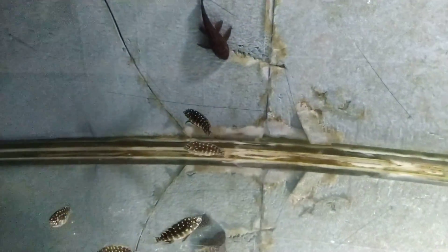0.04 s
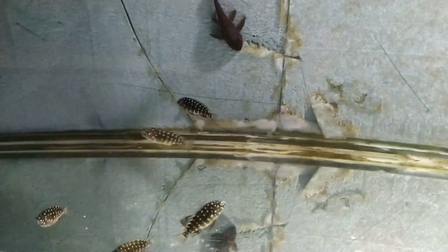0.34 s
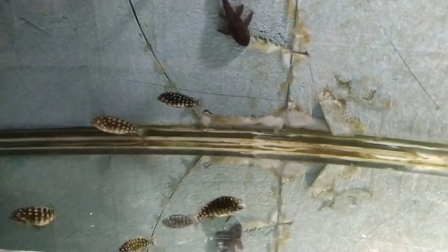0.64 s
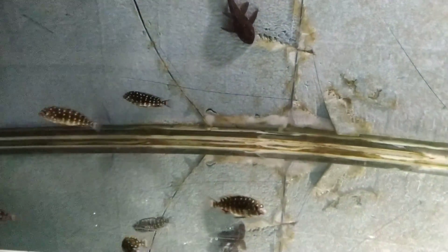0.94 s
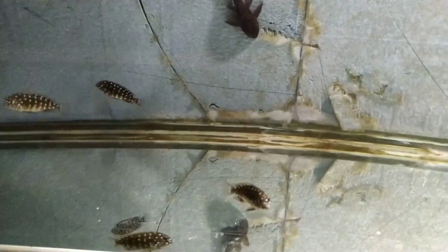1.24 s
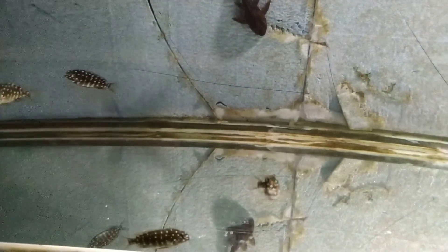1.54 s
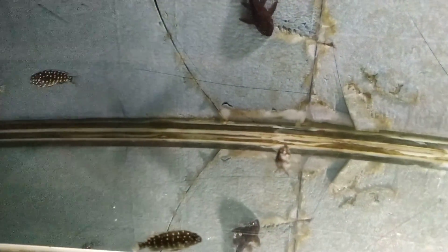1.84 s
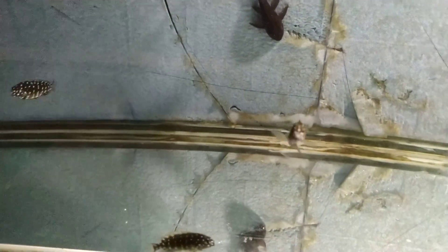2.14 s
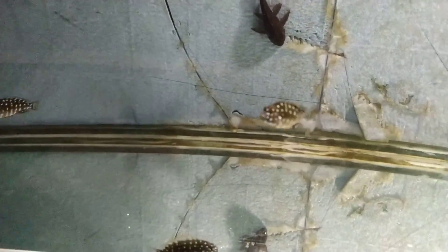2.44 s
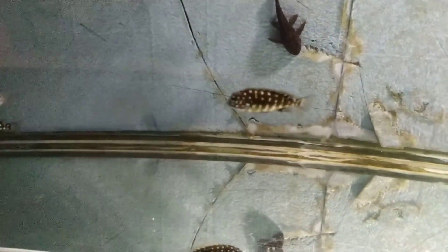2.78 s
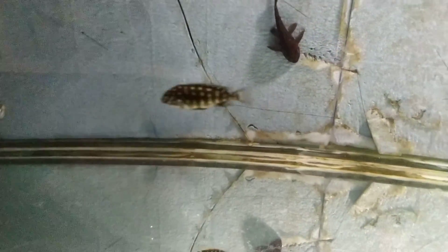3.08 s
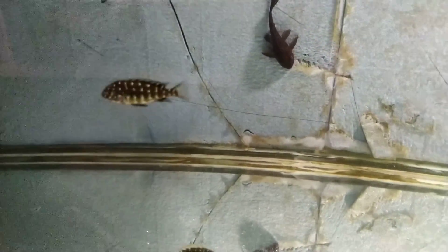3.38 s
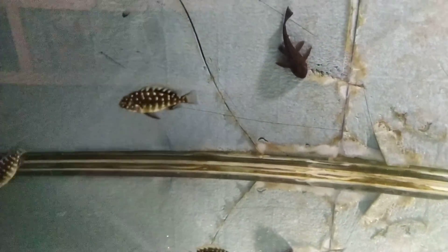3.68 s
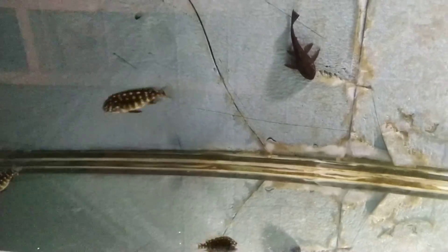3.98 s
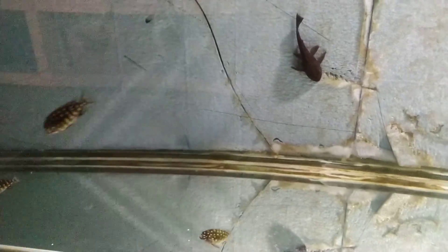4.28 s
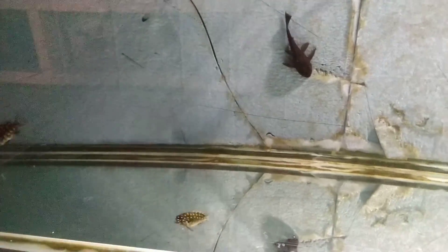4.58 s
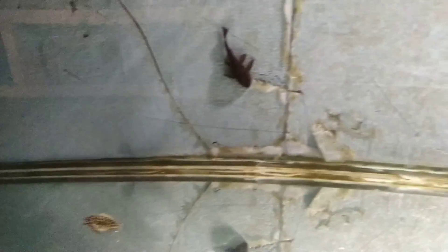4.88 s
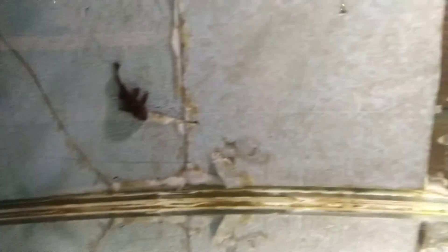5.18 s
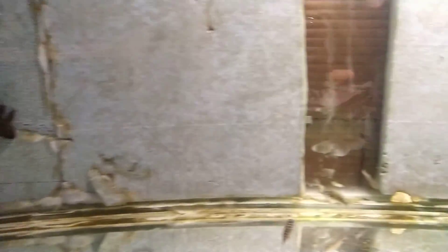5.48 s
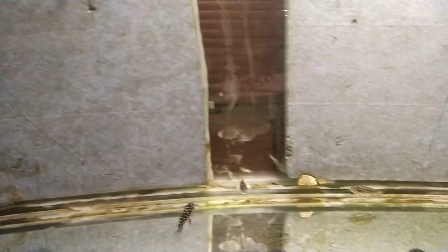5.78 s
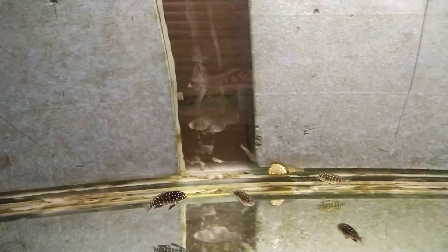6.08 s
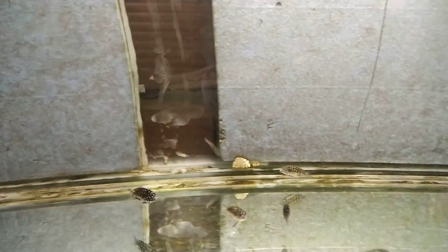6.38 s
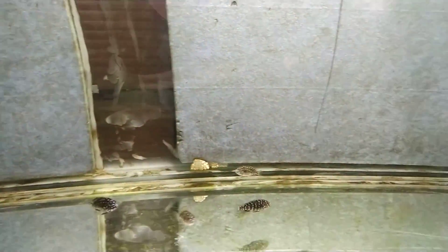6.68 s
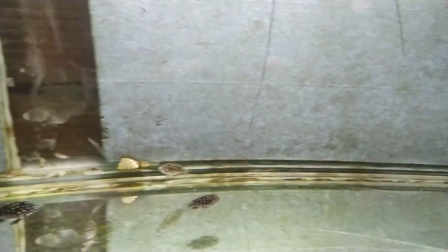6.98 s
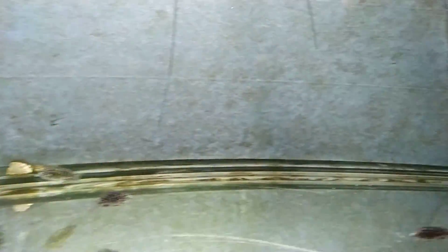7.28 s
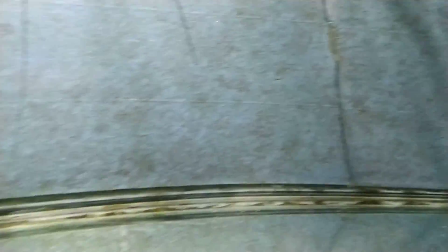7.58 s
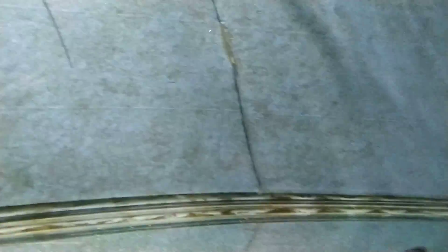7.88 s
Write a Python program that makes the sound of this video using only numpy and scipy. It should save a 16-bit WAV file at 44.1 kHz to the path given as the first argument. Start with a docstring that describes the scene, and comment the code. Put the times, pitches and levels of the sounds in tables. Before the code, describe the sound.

Quiet water trickles in a fish tank indoors, with faint bubble pings and drips above the constant electric hum of a pump. Midway, two electrical pops hit the left side: first a click, then a hard knock far louder than everything else. The microphone travels along the tank, changing the colour of the hum and water, and a soft, short hiss rises just before the end.

```python
"""At an aquarium: a pump hums at mains pitch over softly moving water; small bubbles burst at the surface.
The microphone moves along the tank, so standing waves and tank resonances recolour hum and water.
Twice its left channel pops electrically; the second pop is a hard knock that drives the limiter.
A brief high hiss swells near the end."""
import sys
import numpy as np
from scipy import signal
from scipy.fft import rfft, irfft
from scipy.io import wavfile
from scipy.ndimage import uniform_filter1d

SR = 44100
rng = np.random.default_rng(int(sys.argv[2]) if len(sys.argv) > 2 else 0)


def put_to_file(sound):
    """Save the sound as 16-bit audio at rate SR, in the file named by the first command-line argument."""
    columns = np.atleast_2d(sound).T  # one column per channel
    safe = np.clip(columns, -1, 1)
    whole_steps = np.round(safe * 32767)
    wavfile.write(sys.argv[1], SR, whole_steps.astype(np.int16))


N = 354123
TIME = np.arange(N) / SR

# microphone path: t/s, place along the tank (spots 0, 1, 2)
MIC_PATH = [(0, 0.024), (4.6, 0), (5.7, 0.71), (6.7, 1.28), (7.35, 1.7), (8.03, 1.7)]


def gain_of(db):
    """dB to amplitude factor."""
    return 10 ** (np.asarray(db) / 20)


def unit_rms(x):
    """Scale to rms 1."""
    return x / np.sqrt(np.mean(x ** 2) + 1e-20)


def at_hz(table, hz):
    """Interpolate over log frequency."""
    f, value = np.transpose(table)
    return np.interp(np.log(hz + 1), np.log(f + 1), value)


def follow(table, x):
    """Interpolate linearly."""
    return np.interp(x, *np.transpose(table))


def add(mix, start_s, sound):
    """Mix a sound in at start_s."""
    part = mix[:, max(round(start_s * SR), 0):][:, :sound.shape[1]]
    part += sound[:, :part.shape[1]]


def drift(knots):
    """Slow random curve across the scene."""
    return np.interp(TIME, np.linspace(0, TIME[-1], knots), rng.standard_normal(knots))


def patches(shape, frames, bins):
    """Random field (channel, frame, bin), smoothed, rms 1."""
    field = uniform_filter1d(rng.standard_normal(shape), frames, axis=1)
    return unit_rms(uniform_filter1d(field, bins, axis=2))


def pump(mains_hz=50.0, waver_db=0.37, scatter_rad=0.12, left_delay_s=0.00029):
    """The armature kicks once per mains cycle; high harmonics cross the tank and arrive out of step."""
    # standing-wave hum: harmonic number, peak level/dB at spots 0, 1, 2
    harmonics = [(1, -38.5, -40.5, -42.5), (2, -49, -57, -57), (3, -57.5, -61, -65.5), (4, -56, -57, -64),
                 (5, -67, -63.5, -63), (6, -55.5, -66.5, -53), (7, -63.5, -63, -73), (8, -62.5, -58.5, -56),
                 (9, -59.5, -50.5, -52.5), (10, -64.5, -87, -65), (11, -56, -62.5, -65),
                 (12, -55, -56.5, -63.5), (13, -66, -67, -60), (15, -85, -63, -90), (16, -92, -85, -77),
                 (17, -83, -68, -80), (19, -68, -70, -76), (23, -86, -65, -70), (24, -67, -62, -72),
                 (25, -76, -77, -78), (27, -78, -66, -82), (30, -74, -78, -77)]
    place, out = follow(MIC_PATH, TIME), np.zeros((2, N))
    cycle_rad = 2 * np.pi * np.arange(round(SR / mains_hz)) * mains_hz / SR
    stereo_rad = 2 * np.pi * mains_hz * left_delay_s * np.array([[-.5], [.5]])
    for k, *spots_db in harmonics:
        level_db = np.interp(place, np.arange(3), spots_db) + waver_db * min(k / 6, 1) * drift(knots=20)
        offset_rad = scatter_rad * rng.standard_normal() + stereo_rad
        period = np.cos(k * (cycle_rad + offset_rad))
        out += gain_of(level_db) * np.tile(period, N // len(cycle_rad) + 1)[:, :N]
    return out


def trickle_db(place, outflow_place=0.56, outflow_db=2.3, fade_db_per_place=3):
    """The trickle is loudest at the outflow and fades to either side."""
    return outflow_db - fade_db_per_place * abs(place - outflow_place)


def water(wash_db=-51.5, rumble_db=-49, ripple_rms_db=1.8, n_fft=2048, hop=512):
    """Rumble and trickling wash, coloured by tank resonances that change as the microphone moves."""
    # moving water, its fizz lifted by the microphone port: f/Hz, relative level/dB
    wash_spectrum = [(400, -35), (700, -1), (1000, -1), (1400, -2), (1900, 0), (2680, -1), (3100, -8.5),
                     (6000, -8.5), (7200, -5), (8200, -0.5), (9000, -2), (10500, -11.5), (12400, -13),
                     (14200, -17.5)]
    # tank and room rumble: f/Hz, relative level/dB
    rumble_spectrum = [(3, 1), (15, -4), (30, 6), (55, -4), (80, -12), (120, -18), (220, -20), (320, -15),
                       (400, -20.5), (520, -15), (650, -24), (800, -48), (1400, -65)]
    # tank resonances: f/Hz, width/Hz, lift/dB at spot 0, lift/dB from spot 1 on
    resonances = [(317, 37, 4, -1), (272, 13.3, -21, 10), (732, 39, 8, -1), (828, 32, 3, 11),
                  (1040, 83, -3.5, -0.5), (1276, 46, 8, 4), (1470, 68, 4, -2), (1630, 44, 1, -0.5),
                  (1832, 33, 2.5, 3), (2360, 62, 4.5, -3.5), (11030, 770, 3.5, 2.5)]
    # how far each band follows the trickle: f/Hz, share
    trickle_share = [(100, 0.12), (500, 0.34), (1000, 1), (2500, 1), (4000, 0.26), (8000, 0.35)]
    # flicker from gurgles: f/Hz, rms depth/dB
    gurgle_depth = [(100, .6), (1000, 1.3), (3000, 1.6), (8000, 1.2), (13000, 2.2)]
    # left-right likeness: f/Hz, correlation
    correlation = [(20, 0.66), (100, 0.43), (300, 0.71), (600, 0.29), (1000, -0.18), (2000, -0.12),
                   (4000, -0.1), (14000, 0.075)]
    # channel balance: f/Hz, left minus right/dB
    balance = [(50, 3), (600, 0.5), (1200, 2), (2000, 4), (4000, -2), (8000, 0), (13000, 3)]
    hz = np.fft.rfftfreq(n_fft, 1 / SR)
    t = np.arange(N // hop + 5) * hop / SR
    place = follow(MIC_PATH, t)[:, None]
    moved = np.clip(place, 0, 1)
    shape = (2, len(t), len(hz))
    noise = rng.standard_normal(shape) + 1j * rng.standard_normal(shape)
    rho = at_hz(correlation, hz)
    noise[1] = rho * noise[0] + np.sqrt(1 - rho ** 2) * noise[1]
    wash = gain_of(wash_db) * unit_rms(gain_of(at_hz(wash_spectrum, hz)))
    rumble = gain_of(rumble_db) * unit_rms(gain_of(at_hz(rumble_spectrum, hz)))
    tank_db = sum((near_db + (far_db - near_db) * moved) / (1 + (2 * (hz - mode_hz) / width_hz) ** 4)
                  for mode_hz, width_hz, near_db, far_db in resonances)
    flow_db = trickle_db(place) * at_hz(trickle_share, hz)
    # weak room modes ripple the spectrum, differently per spot and channel
    near, far = (patches((2, 1, len(hz)), frames=1, bins=3) for _ in range(2))
    ripple_db = ripple_rms_db * (near + (far - near) * moved)
    balance_db = at_hz(balance, hz) * np.array([.5, -.5])[:, None, None]
    gurgle_db = at_hz(gurgle_depth, hz) * patches((1, len(t), len(hz)), frames=7, bins=30)
    gain = np.hypot(wash, rumble) * gain_of(tank_db + flow_db + ripple_db + balance_db + gurgle_db)
    framing = dict(nperseg=n_fft, noverlap=n_fft - hop, time_axis=1, freq_axis=2)
    white = signal.istft(noise, **framing)[1][:, :N]
    coloured = signal.istft(noise * gain, **framing)[1][:, :N]
    return coloured / white.std()


def ping(hz, width_hz, t60_s):
    """Decaying noise band: a ping smeared by reflections between water and glass."""
    t = np.arange(SR // 5) / SR
    f = np.fft.rfftfreq(len(t), 1 / SR)
    spectrum = rfft(rng.standard_normal((2, len(t))))
    ring = irfft(spectrum / (1 + (2 * (f - hz) / width_hz) ** 2), len(t))
    attack = 1 - np.exp(-t * width_hz)
    return unit_rms(ring) * gain_of(-60 * t / t60_s) * attack


def bubble(hz, ref_hz=3000):
    """Smaller bubbles ping higher, wider and shorter."""
    ratio = hz / ref_hz
    return ping(hz, width_hz=400 * ratio ** 0.66, t60_s=0.14 * ratio ** -0.25)


def bubbles_and_drops(simmer_per_s=17, faintest_db=-60, spread_db=4, left_db=1):
    """Clear bubbles burst and drops tick on the surface, over a random simmer of faint bubbles."""
    # bursting bubbles: t/s, f/Hz, level/dB
    bursts = [(.185, 11200, -51), (.565, 1620, -48), (.678, 9250, -47), (.85, 3530, -54), (1.19, 1600, -48),
              (1.553, 3830, -55), (2.433, 7050, -49), (2.466, 1730, -45.5), (3.276, 11200, -51),
              (3.36, 10940, -53), (3.49, 3750, -47.5), (3.603, 3300, -47.5), (4.398, 4200, -51),
              (4.593, 2730, -42.5), (4.912, 9700, -42.5), (5.603, 10100, -48), (6.492, 1880, -47)]
    # drop impacts: t/s, f/Hz, width/Hz, level/dB, t60/s
    drops = [(.4027, 8600, 3370, -39.5, .1), (2.463, 8800, 2000, -47, .11),
             (6.448, 3560, 1210, -47.5, 0.24), (6.64, 7900, 1700, -44, .09)]
    # simmer pitches, mostly tiny high bubbles: cumulative share, f/Hz
    simmer_pitch = [(0, 1200), (.4, 3200), (.45, 7500), (1, 11600)]
    out = np.zeros((2, N))
    for start_s, hz, db in bursts:
        add(out, start_s, gain_of(db) * bubble(hz))
    for start_s, hz, width_hz, db, t60_s in drops:
        add(out, start_s, gain_of(db) * ping(hz, width_hz, t60_s))
    for when, quantile, strength in rng.random((round(simmer_per_s * TIME[-1]), 3)):
        db = faintest_db + spread_db * strength ** 2
        add(out, when * TIME[-1], gain_of(db) * bubble(follow(simmer_pitch, quantile)))
    return out * gain_of([[left_db], [-left_db]])


def pops(hold_s=0.014, settle_s=0.043, ring_hz=8300, ring_db=-24, ring_decay_s=0.0003):
    """The left microphone's voltage jumps with a tiny ring, holds, swings below zero and settles."""
    # voltage jumps: t/s, level/dB before the limiter, fall to zero/s
    jumps = [(3.926, -14, 0.039), (4.2895, 13, 0.023)]
    out, t = np.zeros((2, N)), np.arange(SR) / SR
    after_hold_s = np.maximum(t - hold_s, 0)
    ring = gain_of(ring_db) * np.sin(2 * np.pi * ring_hz * t) * np.exp(-t / ring_decay_s)
    for start_s, db, fall_s in jumps:
        pulse = (1 - after_hold_s / fall_s) * np.exp(-after_hold_s / settle_s)
        add(out[:1], start_s, gain_of(db) * (pulse + ring)[None])
    return out


def swish(start_s=7.56, attack_s=0.17, hold_s=0.12, release_s=0.08, level_db=-49.5):
    """A brief swell of high hiss."""
    # hiss spectrum: f/Hz, relative level/dB
    spectrum = [(1500, -19), (3000, -11), (5000, -22), (7000, -9.5), (8500, 1), (10000, -14), (14000, -21)]
    colour = gain_of(at_hz(spectrum, np.fft.rfftfreq(SR, 1 / SR)))
    hiss = unit_rms(irfft(rfft(rng.standard_normal((2, SR))) * colour, SR))
    corners_s = np.cumsum([0, attack_s, hold_s, release_s])
    envelope = np.interp(np.arange(SR) / SR, corners_s, [0, 1, 1, 0])
    out = np.zeros((2, N))
    add(out, start_s, gain_of(level_db) * hiss * envelope)
    return out


def scene():
    """Stereo sum of all sources."""
    return pump() + water() + swish() + bubbles_and_drops() + pops()


def record(dry, ceiling_db=-0.1, recovery_db_per_s=70, cutoff_hz=14330):
    """Per-channel limiter, instant clamp and slow recovery; then a low-pass."""
    over_db = np.maximum(20 * np.log10(abs(dry) + 1e-9) - ceiling_db, 0)
    recovery_db = TIME * recovery_db_per_s
    reduction_db = np.maximum.accumulate(over_db + recovery_db, axis=1) - recovery_db
    limited = dry / gain_of(reduction_db)
    low_pass = signal.firwin(511, cutoff_hz, window=("kaiser", 9), fs=SR)
    return signal.oaconvolve(limited, low_pass[None], "same")


dry = scene()
out = record(dry)
put_to_file(out)
```